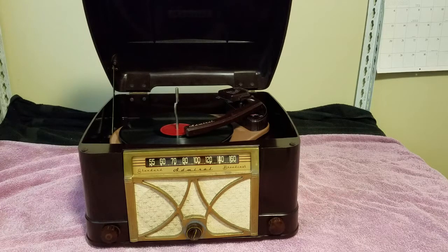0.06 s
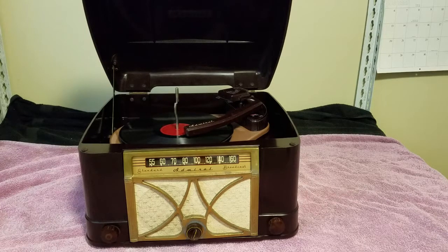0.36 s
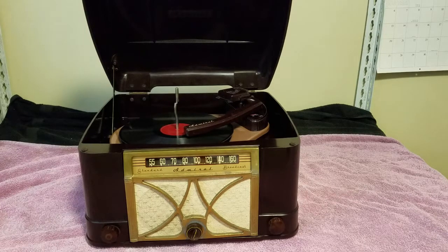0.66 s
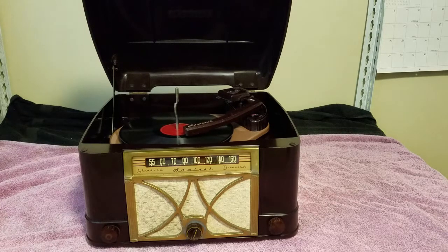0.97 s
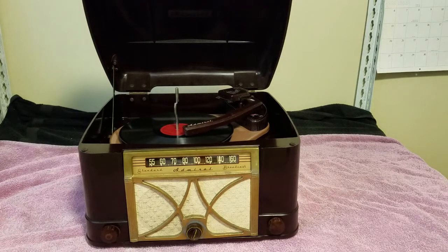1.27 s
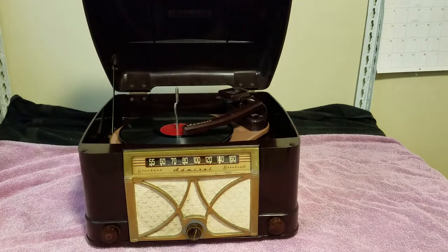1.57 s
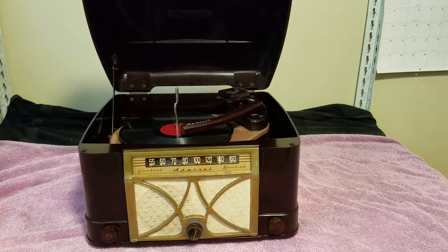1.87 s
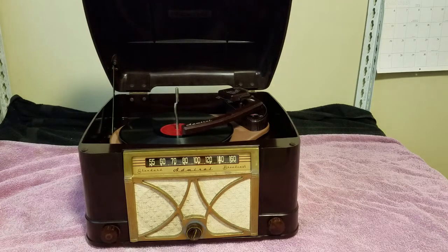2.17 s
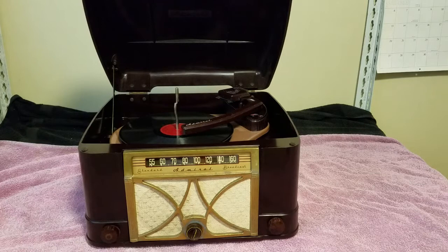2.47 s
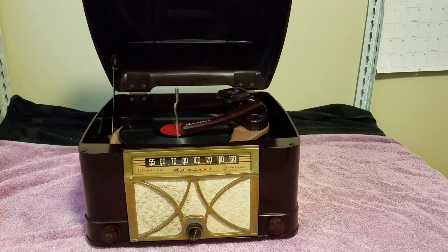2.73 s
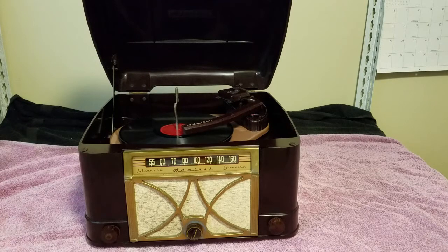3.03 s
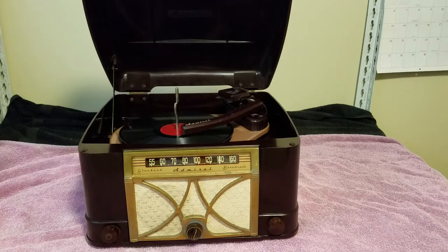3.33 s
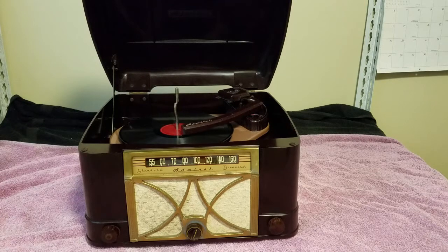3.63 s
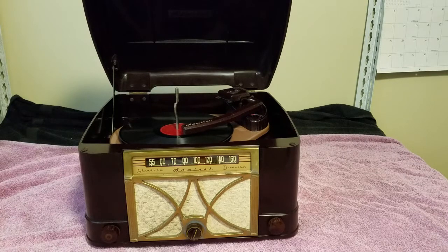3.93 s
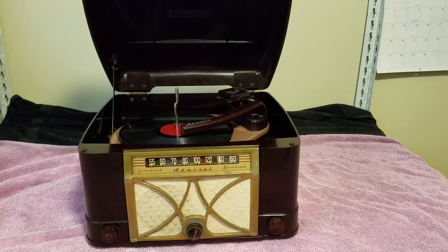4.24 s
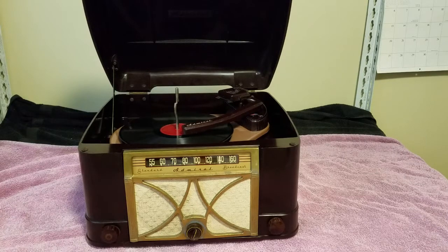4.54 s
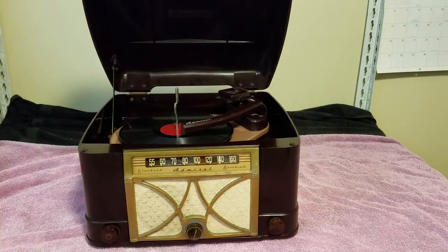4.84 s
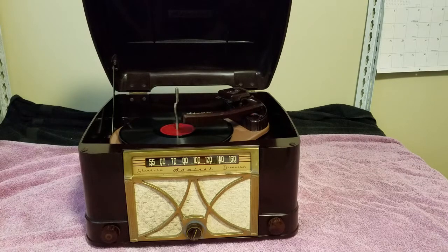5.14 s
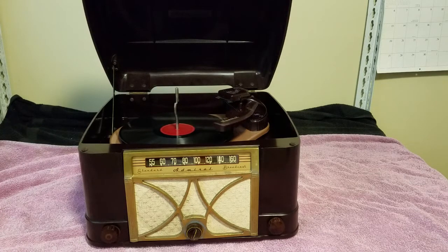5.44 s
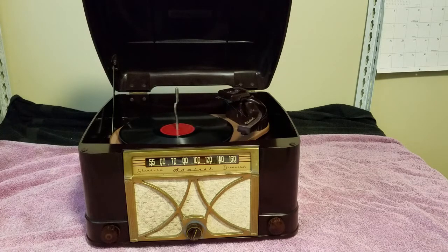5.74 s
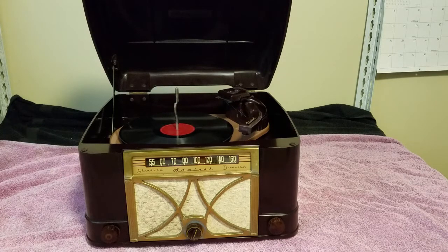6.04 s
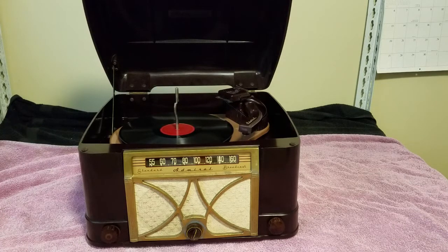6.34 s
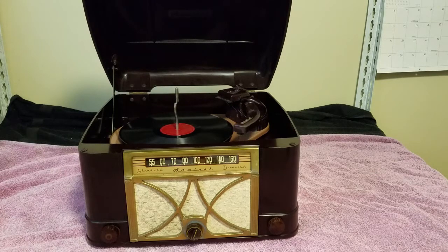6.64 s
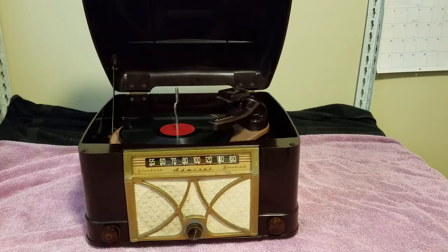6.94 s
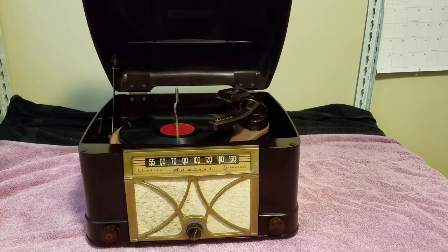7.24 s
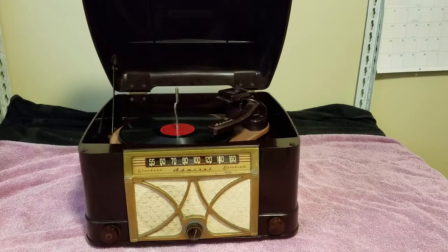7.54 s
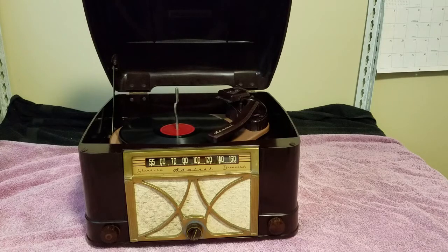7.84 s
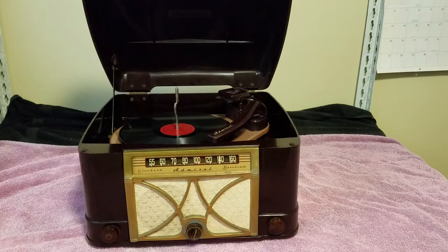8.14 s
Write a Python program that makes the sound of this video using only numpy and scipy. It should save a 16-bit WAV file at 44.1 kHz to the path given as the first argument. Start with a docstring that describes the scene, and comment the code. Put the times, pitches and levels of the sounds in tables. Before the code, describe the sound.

An old record player's needle scrapes and pops through the final groove, then the arm lifts, clicks and lands again over a low hum.

```python
"""An old valve record changer in a small room plays the end of a shellac disc through its loudspeaker.
First the needle scrapes down the run-out, the groove after the music. Then it circles the closed last
groove four times, meeting the same scuffs and pops on each turn. Near 5 s the arm lifts with a thump,
and levers click as it swings out and back. At 8 s the needle lands on the rim again.
The motor's rumble, mains hum and a soft hiss go on throughout."""
import sys
import numpy as np
from scipy import signal
from scipy.fft import rfft, irfft
from scipy.io import wavfile
from scipy.ndimage import uniform_filter1d

SR = 44100
rng = np.random.default_rng(int(sys.argv[2]) if len(sys.argv) > 2 else 0)


def waveform_to_disk(signal):
    """Save audio, clipped to [-1, 1], as 16-bit WAV at the path in sys.argv[1]."""
    frames = np.transpose(np.atleast_2d(signal))
    scaled = np.clip(frames, -1, 1) * 32767
    samples = np.round(scaled).astype(np.int16)
    wavfile.write(sys.argv[1], SR, samples)


N = 370440
T = np.arange(N) / SR
SIZE = 16384  # samples used to build a filter
HZ = np.maximum(np.fft.rfftfreq(SIZE, 1 / SR), 1)

RUN_OUT_S, LIFT_S, LAND_S = .822, 4.948, 8.024  # the needle enters the run-out, lifts, lands
TURN_S, SEAT_S = .75632, 0.011  # one turn of the disc; the needle slipping into or out of a groove
LOOP_FROM_S, LOOP_TO_S = 1.78, 4.69  # the needle circles the closed groove
IN_LOOP = (T > LOOP_FROM_S) & (T < LOOP_TO_S)


def needle():
    """The needle rubs the disc: scratch, rumble and pops from the loudspeaker, rasp from the tip."""
    speaker = smear(ring(loudspeaker()), hz=2806)
    scratch_gain, rumble_gain, rasp_gain = np.hypot(groove_gains(), scuff_gains())
    scratch = through(grit(IN_LOOP, grain_db=4, fresh=0.85) * scratch_gain, speaker)
    # coarse wear moves the needle further and more slowly, so it sounds deeper
    wear = slope([(100, -9.5), (200, -6), (400, -2), (900, -7), (1800, -9),
                  (4000, -18.5), (15000, -42.5)])
    bumps = grit(IN_LOOP, grain_db=2, fresh=0.43)
    rumble = unit(through(bumps, ring(wear * loudspeaker())))
    return scratch + rumble * rumble_gain + rasp() * rasp_gain + pops(speaker)


def grit(looping, grain_db, fresh, clump_db=4):
    """Tiny uneven knocks in clumps. While looping they repeat each turn, with fresh ones mixed in."""
    def knocks():
        clumps = unit(uniform_filter1d(rng.standard_normal(N), size=130))
        noise = rng.standard_normal(N)
        sizes = np.minimum(rng.exponential(size=N), 6)
        return unit(noise * undb(grain_db * sizes + clump_db * clumps))
    new = knocks()
    repeated = np.resize(knocks()[:int(TURN_S * SR)], N)
    return np.where(looping, (repeated + fresh * new) / np.hypot(1, fresh), new)


# stretches of groove the needle rides: from/s, to/s, scratch/dB, rumble/dB, rasp/dB
GROOVE_RIDES = [(-1, RUN_OUT_S, -59, -59, -66.5), (RUN_OUT_S, LIFT_S, -50, -56, -57),
                (LAND_S, 8.5, -46, -50, -55)]
def groove_gains(worn_at_s=2.695, worn_db=1):
    """Strength of scratch, rumble and rasp. One side of the disc is more worn, so they swell each turn."""
    worn = undb(worn_db * np.cos(2 * np.pi * (T - worn_at_s) / TURN_S))
    return worn * sum(np.outer(undb(db), gate(start, end, SEAT_S)) for start, end, *db in GROOVE_RIDES)


# scuffs crossed once: t/s, length/s, scratch/dB, rumble/dB
SINGLE_SCUFFS = [(.822, 0.052, -34.5, -32.5), (.92, 0.076, -38.5, -39.5), (1.15, 0.054, -38, -37),
                 (1.31, 0.033, -38.5, -34), (1.356, 0.0058, -36, -29), (1.385, 0.049, -40, -38.5),
                 (1.57, 0.039, -45.5, -41.5), (4.75, 0.0098, -44, -41.5), (4.885, 0.012, -39.5, -31.5),
                 (8.19, 0.048, -36.5, -42)]
# scuffs met on every turn of the closed groove: t/s, length/s, scratch/dB, rumble/dB
REPEATING_SCUFFS = [(2.517, 0.02, -40.5, -37), (2.59, 0.039, -42.5, -41), (2.685, 0.025, -38, -33),
                    (2.765, 0.017, -40, -50), (2.825, 0.086, -42.5, -26), (2.868, .03, -42.5, -34)]
def scuff_gains(attack_s=0.0013, swell_db=7.5, release_s=0.019, turn_start_s=2.45, rasp_db=-19):
    """Strength of scratch, rumble and rasp in scuffs: each bites at once, grows, then fades."""
    def cross(table, t):
        gains = 0
        for s, length_s, *levels_db in table:
            age = t - s
            bite = np.clip(age / attack_s, 0, 1)
            swell = undb(swell_db * np.clip(age / length_s - 1, -1, 0))
            fade = np.exp(-np.maximum(age - length_s, 0) / release_s)
            gains = gains + np.outer(undb(levels_db), bite * swell * fade)
        return gains
    loop_time = turn_start_s + (T - turn_start_s) % TURN_S
    scratch, rumble = cross(SINGLE_SCUFFS, T) + IN_LOOP * cross(REPEATING_SCUFFS, loop_time)
    return scratch, rumble, scratch * undb(rasp_db)


# single jolts (dust, ridges, lifting off, landing): t/s, level/dB, treble cutoff/Hz
NEEDLE_JOLTS = [(0.1362, -40, 6000), (0.414, -33.5, 4000), (.65, -33.5, 1800), (0.8195, -13.5, 910),
                (.8219, -17.5, 164), (0.8856, -19, 4000), (1.125, -27, 900), (1.215, -21.5, 4000),
                (1.2786, -15.5, 4500), (1.4941, -25, 3900), (1.543, -21.5, 3020), (1.6522, -20, 4100),
                (1.7268, -19.5, 704), (1.9452, -23, 2500), (2.190, -14.5, 282), (3.099, -28, 2500),
                (3.702, -16.5, 350), (4.7027, -25.5, 880), (4.759, -22, 166), (4.77, -24.5, 131),
                (4.802, -23.5, 220), (4.8525, -20, 2510), (4.945, -11.5, 242), (8.02, -17, 147),
                (8.058, -30, 130), (8.254, -23.5, 238)]
# pits met on every turn of the closed groove: t/s, level/dB, treble cutoff/Hz
LOOP_PITS = [(2.5274, -22, 380), (2.5806, -21, 3520), (2.585, -23, 4000), (2.6202, -23.5, 1400),
             (2.6446, -23, 2880), (2.7018, -30, 2500), (2.7161, -22.5, 3500), (2.826, -20, 770),
             (2.8946, -14, 150), (2.913, -16.5, 400), (3.03, -26, 5200), (3.1286, -31.5, 4060)]
def pops(speaker):
    """Each jolt kicks the loudspeaker: a broad bump gives a dull thump, a sharp pit a bright tick."""
    pits = [(s + turn * TURN_S, db + .8 * rng.standard_normal(), hz)
            for turn in range(-1, 3) for s, db, hz in LOOP_PITS]
    pits = [pit for pit in pits if pit[0] > LOOP_FROM_S]
    out = np.zeros(N)
    for s, db, cutoff_hz in NEEDLE_JOLTS + pits + dust():
        pop = lowpass(speaker, cutoff_hz)
        add(out, s, lowpass(pop, min(4 * cutoff_hz, 6000)), db)
    return out


def dust(per_s=9, least_db=-33.5, spread_db=2, cutoff_hz=3400):
    """Fine dust gives faint jolts at random times, from the run-out until the arm lifts."""
    gaps, sizes = rng.exponential(size=(100, 2)).T
    times = RUN_OUT_S + np.cumsum(gaps) / per_s
    return [(s, least_db + spread_db * min(size, 2), cutoff_hz)
            for s, size in zip(times, sizes) if s < LIFT_S]


# notes at which the loudspeaker's sound rings, in its box and the room around it: f/Hz, width/Hz, level/dB
SPEAKER_MODES = [(193, 21, 4), (253, 14, 2), (289, 60, -2), (409, 26, -2), (583, 37, 2), (669, 90, -15),
                 (763, 95, -3), (1014, 24, -1), (1094, 14, 3), (1153, 74, 0), (1241, 26, 3), (1342, 35, -1),
                 (1492, 46, 0), (1535, 14, -4), (1699, 112, -5), (1962, 76, -7), (2159, 66, -2),
                 (2333, 45, -1), (2523, 139, -5), (2767, 42, -3), (2869, 29, -1), (2949, 160, -6),
                 (3256, 54, -6), (3444, 118, -4), (3676, 44, -15), (3887, 160, -9), (4173, 32, -14),
                 (4345, 87, -9), (4812, 160, -9)]
# how strongly the loudspeaker's cone plays each pitch: f/Hz, level/dB
CONE_CURVE = [(30, -35), (90, -21.5), (150, -1.5), (300, -1), (1700, -1.5), (1820, -7.5), (1950, 2),
              (3000, 4), (3450, 3), (3900, 7.5), (4350, 6.5), (5000, 5), (6300, 14), (7050, 14.5),
              (8000, 6), (9200, 1.5), (10400, 9), (12200, -15), (15500, -17)]
def loudspeaker():
    """The tone colour that box, cone and the nearby room give to all the loudspeaker plays, as a gain for each
    frequency."""
    return resonances(SPEAKER_MODES) * slope(CONE_CURVE)


def smear(response, hz):
    """The cone answers late around hz and an octave below, so a tick swings both ways."""
    for centre in (hz, hz / 2):
        pole = .91 * np.exp(2j * np.pi * centre / SR)
        allpass = np.poly([pole, pole.conj()]).real
        response = signal.lfilter(allpass[::-1], allpass, response)
    return response


# notes at which the needle and its holder ring: f/Hz, width/Hz, level/dB
NEEDLE_MODES = [(2900, 500, -10), (3860, 1000, 12.5), (7000, 250, 4), (10200, 480, -10),
                (13500, 1400, -5.5), (15100, 930, -8)]
def rasp():
    """The shaking needle sends a fine rasp straight into the air."""
    return unit(through(grit(False, grain_db=1, fresh=1), ring(resonances(NEEDLE_MODES))))


# a short low groan: t/s, length/s, first pitch/Hz, last pitch/Hz, level/dB
GROAN_NOTE = (2.318, .06, 345, 315, -42)
def groan():
    """One soft falling tone."""
    s, length_s, first_hz, last_hz, db = GROAN_NOTE
    progress = np.clip((T - s) / length_s, 0, 1)
    hz = first_hz + (last_hz - first_hz) * progress
    return undb(db) * np.sin(np.pi * progress) ** 2 * np.sin(2 * np.pi * np.cumsum(hz) / SR)


# clicks of levers and catches: t/s, level/dB, treble/dB, chatter/s, the part's own ring/Hz
LEVER_CLICKS = [(4.801, -27, -10, 0.0026, 11500), (5.01, -43, 12, .001, 10200),
                (5.3028, -36, -6, 0.015, 1690), (5.3712, -33.5, -2.5, 0.0081, 1150),
                (5.4273, -30.5, -5, 0.0065, 2340), (5.474, -30.5, 2, 0.0056, 1790),
                (5.5538, -20, -1, 0.0045, 1600), (5.5545, -19, 11, 0.0014, 3700),
                (5.747, -44, -17, 0.0021, 3800), (6.2034, -45, -8, 0.0027, 2110),
                (6.232, -48, -19, 0.01, 1140), (6.257, -44, -32, 0.0099, 870),
                (7.0958, -31.5, -13, 0.0025, 3850), (7.1133, -29.5, -9, 0.00093, 3900),
                (7.508, -47.5, -14, 0.0078, 1690), (7.557, -42.5, -8, 0.0092, 1060),
                (7.667, -51, -0.5, 0.0025, 2200), (8.165, -23, -24, 0.0055, 850),
                (8.2025, -27.5, -10, 0.0049, 3100), (8.2148, -31, 16, 0.0073, 12200),
                (8.219, -28, -56, .0039, 820), (8.2504, -40, 1, .002, 2800)]
# notes at which the steel frame under them rings: f/Hz, width/Hz, level/dB
FRAME_MODES = [(390, 240, 6), (880, 100, 4.5), (1225, 220, 3.5), (1820, 350, -1), (2300, 280, 1),
               (3800, 970, -5.5), (5000, 400, -17), (6700, 1100, -9), (8800, 610, -12), (10550, 760, -11.5),
               (12500, 960, -16), (14800, 5500, -16)]
def levers():
    """Steel parts meet, chatter for a moment and ring the frame, which gives off little bass."""
    out, t = np.zeros(N), T[:SIZE // 4]
    frame = resonances(FRAME_MODES) * HZ / np.hypot(HZ, 600)
    for s, db, treble_db, chatter_s, part_hz in LEVER_CLICKS:
        contact = rng.standard_normal(len(t)) * (np.exp(-t / chatter_s) + 0.086 * np.exp(-t / 0.0081))
        contact[0] += 6  # the first hard hit
        part = 1 + resonances([(part_hz, .25 * part_hz, 0)])
        treble = undb(treble_db / (1 + (3500 / HZ) ** 2))
        add(out, s, through(contact, ring(frame * part * treble)), db)
    return out


# swings of the deck, the plate that carries the turntable: t/s, level/dB, f/Hz
DECK_SWINGS = [(4.755, -45, 75.4), (4.8, -42, 65), (8.225, -45, 50)]
def rocking():
    """The deck rocks on its springs as the cam, the wheel that moves the arm, grips and lets go."""
    out, t = np.zeros(N), T[:SIZE]
    for s, db, hz in DECK_SWINGS:
        add(out, s, np.sin(2 * np.pi * hz * t) * t * np.exp(-t / 0.0098), db)
    return out


# notes at which the deck rings: f/Hz, width/Hz, level/dB
DECK_MODES = [(40.4, 3.4, -25), (61.3, 13, -47), (154.6, 8.6, 2), (173.2, 9.9, 1.5), (196.2, 3.8, 5),
              (216, 13.4, -1), (271, 19, -7), (338, 14, -15), (434, 20, -32.5), (616, 27, -43),
              (860, 24, -21.5), (920, 60, -30), (1070, 75, -29.5), (2030, 300, -47)]
def motor(deck_db=-52.5, picked_up_db=-55.5):
    """The motor shakes the deck; the needle picks up more of this rumble while it is down."""
    rumble = unit(through(rng.standard_normal(N), ring(resonances(DECK_MODES))))
    return rumble * (undb(deck_db) + needle_down(SEAT_S) * undb(picked_up_db))


# tones in the hum: multiple of the mains frequency, relative level/dB
HUM_TONES = [(1, -18), (2, 0), (3, -24), (4, -18), (5, -18), (7, -22), (9, -18)]
def hum(mains_hz=60, idle_db=-50, playing_boost_db=3):
    """The mains power hums, louder while the needle is down."""
    tones = sum(undb(db) * np.sin(2 * np.pi * (k * mains_hz * T + rng.random())) for k, db in HUM_TONES)
    return np.sqrt(2) * tones * undb(idle_db + playing_boost_db * needle_down(fade_s=0.22))


# spells of gear whine: from/s, to/s, f/Hz, level/dB
GEAR_WHINES = [(5.005, 5.8, 828, -72), (7.15, 8.1, 825, -71)]
def gears():
    """The gears whine thinly while the cam lifts and lowers the arm."""
    return np.sqrt(2) * sum(undb(db) * gate(start, end, fade_s=0.12) * np.sin(2 * np.pi * hz * T)
                            for start, end, hz, db in GEAR_WHINES)


# tone colour of the hiss: f/Hz, relative level/dB
HISS_CURVE = [(30, 24.5), (500, 15), (2000, 7.5), (4000, -2.5), (7000, -9), (9900, -8), (10600, 7.5),
              (11300, 0.5), (15500, 1.5)]
def hiss(db=-64.5):
    """Smooth, steady hiss, unrelated left and right."""
    colour = ring(slope(HISS_CURVE))
    return undb(db) * np.array([unit(through(noise, colour)) for noise in rng.standard_normal((2, N))])


def room(x, wet_db, bass_wet_db, lid_db, lid_s, bass_hz=400):
    """Sound arrives left and right: directly, off the open lid, and as a short (wet) room echo."""
    t = T[:SIZE]
    delay = lambda s: np.exp(-2j * np.pi * HZ * s)
    bounce = undb(lid_db) * delay(lid_s) * HZ / (HZ + bass_hz)
    echo_gain = undb(wet_db + bass_wet_db / (1 + (HZ / bass_hz) ** 2))
    echoes = []
    for noise in rng.standard_normal((2, SIZE)):
        low = lowpass(noise, 4000)
        # the echo dies by 60 dB in 0.28 s, its treble in 0.22 s
        echo = low * undb(-60 * t / 0.28) + (noise - low) * undb(-60 * t / 0.22)
        echo *= np.clip(t / 0.003 - .5, 0, 1)
        echoes.append(rfft(echo / np.linalg.norm(echo)) * echo_gain)
    alike = 1 / (1 + (HZ / 600) ** 2)  # long waves reach both sides alike
    mid, side = echoes[0] * np.sqrt((1 + alike) / 2), echoes[1] * np.sqrt((1 - alike) / 2)
    left = 1 + bounce + mid + side
    right = delay(8.5e-5) + bounce * delay(4e-4) + mid - side
    return np.array([through(x, irfft(path)) for path in (left, right)])


def needle_down(fade_s):
    """1 while the needle touches the disc, 0 while it is lifted."""
    return sum(gate(start, end, fade_s) for start, end, *_ in GROOVE_RIDES)


def gate(from_s, to_s, fade_s):
    """1 between two times, with straight fades."""
    return np.clip(np.minimum(T - from_s, to_s - T) / fade_s + .5, 0, 1)


def undb(db):
    """Turn decibels into a gain to multiply by."""
    return 10 ** (np.asarray(db) / 20)


def unit(x):
    """Scale to an average strength (rms) of 1."""
    return x / np.sqrt(np.mean(x ** 2))


def slope(points):
    """Gain curve through points of f/Hz, level/dB."""
    hz, db = np.transpose(points)
    return undb(np.interp(np.log(HZ), np.log(hz), db))


def resonances(modes):
    """Gain curve of a body that rings at certain notes, its modes."""
    return np.sqrt(sum(undb(2 * db) / (1 + ((HZ ** 2 - hz ** 2) / (HZ * width)) ** 2)
                       for hz, width, db in modes))


def ring(gain):
    """How a body with this gain curve answers one tap, scaled to an energy of 1."""
    cepstrum = irfft(np.log(gain))
    cepstrum[1:SIZE // 2] *= 2  # folded so that nothing sounds before the tap
    cepstrum[SIZE // 2 + 1:] = 0
    response = irfft(np.exp(rfft(cepstrum)))[:SIZE // 2]
    return response / np.linalg.norm(response)


def through(x, response):
    """Play x through a body with this answer to a tap."""
    return signal.fftconvolve(x, response)[:len(x)]


def lowpass(x, hz):
    """Gently dull the treble above hz."""
    return signal.sosfilt(signal.butter(1, hz, fs=SR, output="sos"), x)


def add(out, s, x, db):
    """Mix x into out at time s, with its loudest moment at db."""
    start = int(s * SR)
    peak = np.sqrt(2 * uniform_filter1d(x ** 2, size=32).max())
    out[start:start + len(x)] += x[:N - start] * undb(db) / peak


def scene():
    """Needle, levers and motor in the room, over hum and hiss."""
    tones, rumble = hum() + gears(), motor()
    disc = room(needle() + groan(), wet_db=-4.5, bass_wet_db=-1.5, lid_db=-19, lid_s=0.005)
    clicks = room(levers(), wet_db=-2, bass_wet_db=2, lid_db=-9, lid_s=0.0019)
    deck = room(rumble, wet_db=1, bass_wet_db=-13, lid_db=-18, lid_s=0.0016)
    return disc + clicks + deck + rocking() + tones + hiss()


def record(dry):
    """The left side has a little less bass and more treble than the right; the very top is cut."""
    left_over_right = slope([(100, -3), (220, -1.5), (700, -0.5), (2400, -1.5), (4400, 0.5), (12000, 2)])
    lean = np.interp(np.fft.rfftfreq(N, 1 / SR), HZ, np.sqrt(left_over_right))
    stereo = irfft(rfft(dry) * np.array([lean, 1 / lean]), N)
    return signal.sosfilt(signal.ellip(10, .2, 70, 15850, fs=SR, output="sos"), stereo)


dry = scene()
out = record(dry)
waveform_to_disk(out)
```